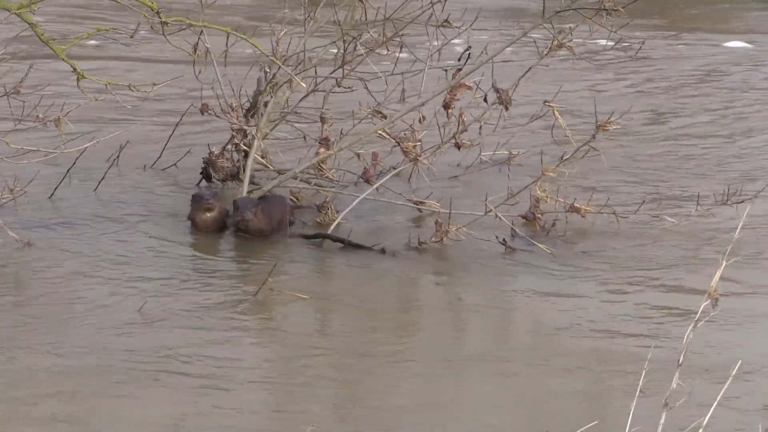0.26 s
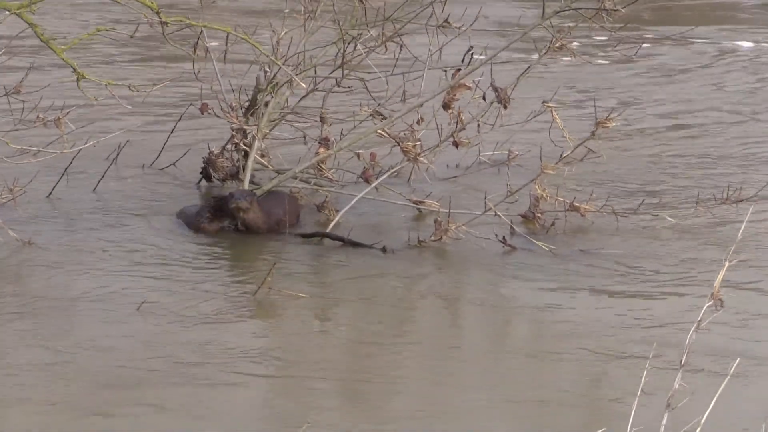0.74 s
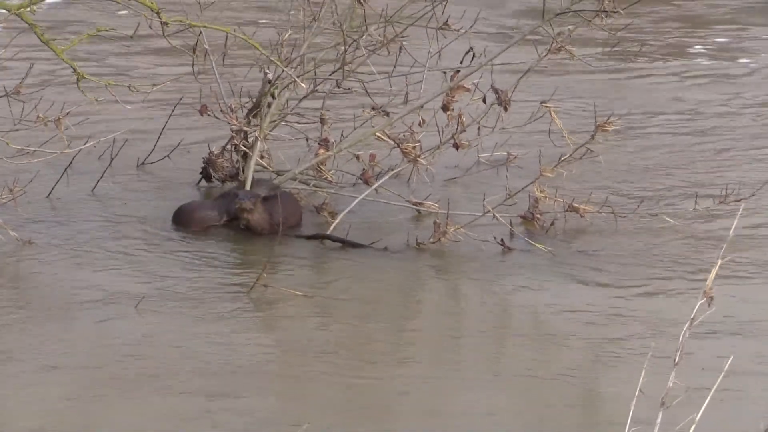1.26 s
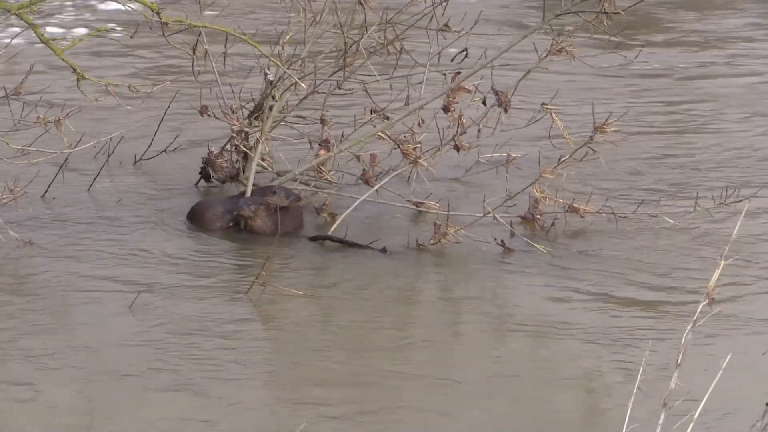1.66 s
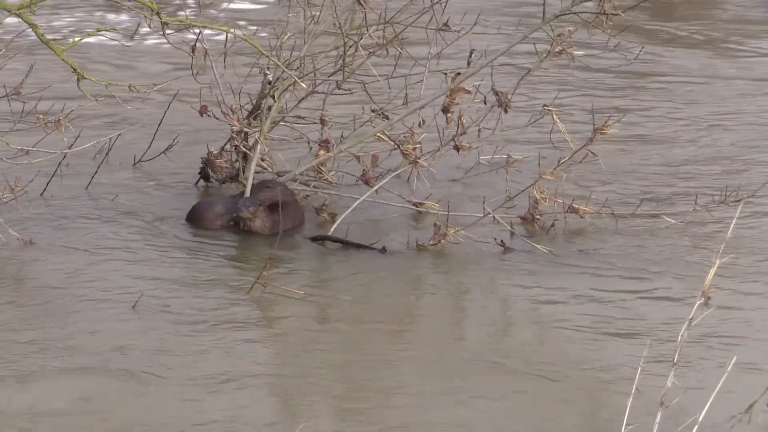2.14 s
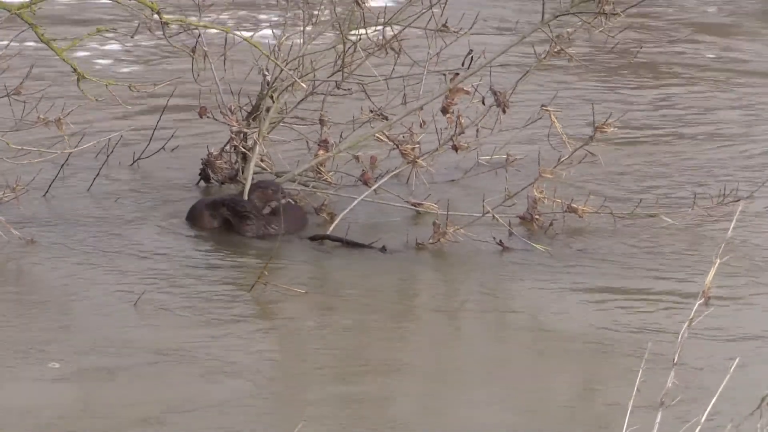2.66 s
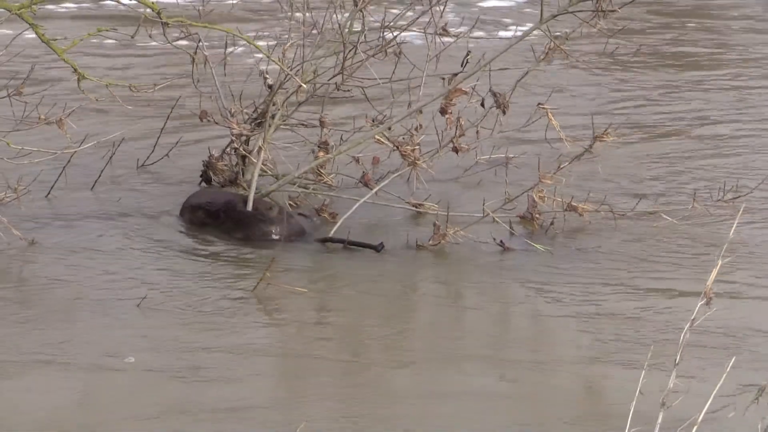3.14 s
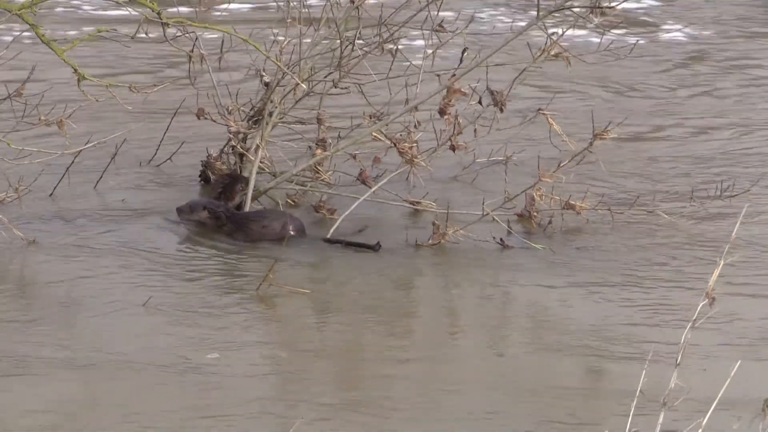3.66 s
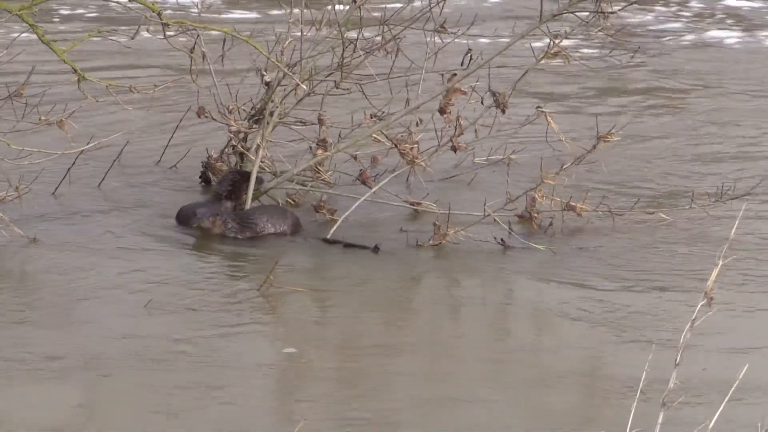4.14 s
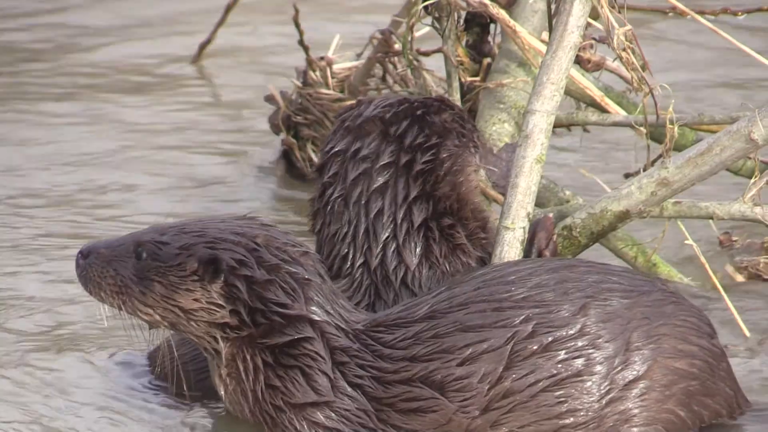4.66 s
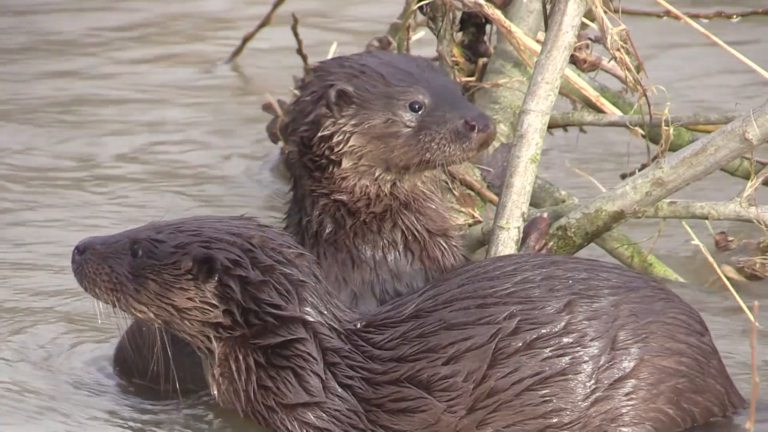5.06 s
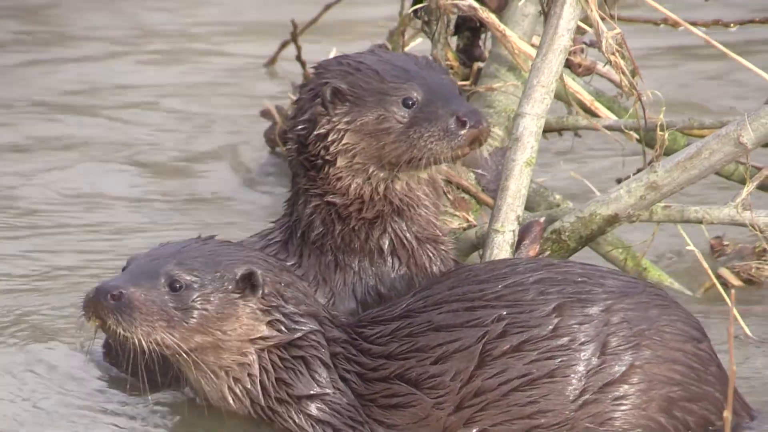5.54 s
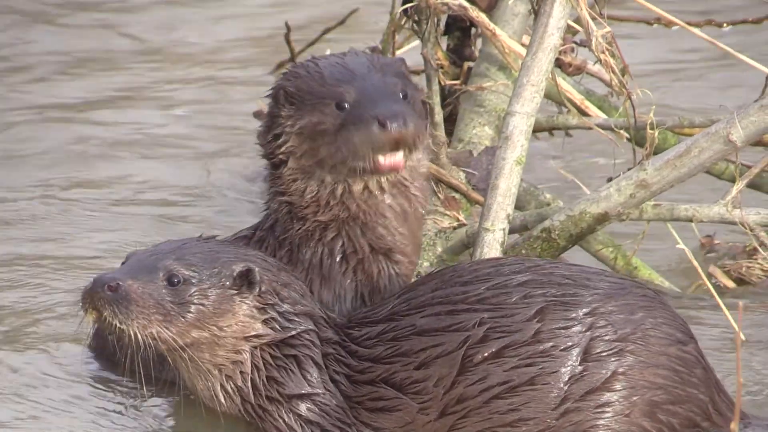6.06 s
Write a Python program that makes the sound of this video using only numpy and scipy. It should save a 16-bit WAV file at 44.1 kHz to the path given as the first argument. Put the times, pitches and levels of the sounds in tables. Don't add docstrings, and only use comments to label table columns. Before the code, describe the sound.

Two young otters give short, piercing, high whistle-squeaks about twice a second over the steady low rush of a flooded river.

```python
import sys
import numpy as np
from scipy import signal
from scipy.io import wavfile
from scipy.ndimage import uniform_filter1d, minimum_filter1d

SR = 44100
rng = np.random.default_rng(int(sys.argv[2]) if len(sys.argv) > 2 else 0)


def elevation(decibels):
    levels = np.asarray(decibels, float)
    return 10 ** (levels / 20)


def generate_wav(signal):
    frames = np.transpose(np.atleast_2d(signal))
    scaled = np.clip(frames, -1, 1) * 32767
    pcm = np.round(scaled).astype(np.int16)
    wavfile.write(sys.argv[1], SR, pcm)


N = 278271

# frequency in Hz, level in dB per Hz.
RIVER_SPECTRUM = [(71, -18), (120, -11), (220, -8), (264, -14), (357, -9.5), (455, -14), (770, -12),
                  (1760, -20), (5350, -40), (13600, -51), (15000, -70)]
# frequency in Hz, left-right correlation 0-1.
RIVER_LIKENESS = [(100, 1), (250, 0.83), (400, 0.89), (600, 0.91), (1200, 0.86), (2500, 0.64), (6000, 0.53),
                  (12000, 0.056)]
# time in s, level in dB.
RIVER_FLOW = [(0, -34), (.3, -31.5), (.7, -32.5), (1.2, -33), (1.7, -32), (2.1, -34), (2.5, -34),
              (3.2, -33), (4.1, -34), (5.0, -33.5), (5.95, -33.5), (6.31, -33)]
# time in s, level in dB.
WIND_GUSTS = [(0.0, -24), (0.1, -12.5), (0.24, -19.5), (1.28, -29), (1.44, -23), (1.54, -25.5),
              (1.67, -20.5), (2.09, -24.5), (2.3, -17), (2.44, -31), (2.49, -19), (2.79, -27.5),
              (2.9, -14.5), (2.99, -23), (3.85, -21.5), (3.99, -31.5), (6.27, -40), (6.31, -36)]
# time in s, change in dB, half width in s.
WIND_BUFFETS = [(.05, -4.5, 0.039), (.25, 2, 0.035), (.6, -3.5, 0.072), (.97, 2, 0.046), (1.15, 2.5, 0.033),
                (1.38, 3, 0.078), (1.65, 0, .04), (1.82, 3, 0.056), (1.95, 0, .04), (2.06, 2.5, .04),
                (2.2, 4, .04), (2.45, 2.5, 0.052), (2.92, -3.5, .03), (3.15, 3, 0.055), (3.53, 6, 0.06),
                (3.93, 0.5, .04), (4.2, -1.5, 0.076), (6.1, 3.5, .15)]
# frequency in Hz, width in Hz, level in dB, start in s, end in s.
MACHINE_HUMS = [
    (44, 6, -35, 4.75, 7.6),
    (63.1, 5.3, -37, 5.2, 7.1),
    (105.8, 9.7, -33, 0.2, 3.9),
    (106, 13, -35, 3.9, 6.4),
    (132.4, 4.5, -37.5, 3.2, 4.7),
    (215.3, 11.4, -49, 2.4, 5.83),
    (240, 2.9, -46, 0.1, 7.5),
]
# time in s, peak in dB, above 10 kHz relative in dB, left minus right in dB.
TWIG_TICKS = [(0.169, -54, -12, -12), (0.188, -54, -18, -12), (0.31, -55, -15, -10), (2.461, -59, -20, 5),
              (2.616, -54, -22, -8), (2.68, -57, 0, -10), (2.78, -56, -8, 5), (5.58, -59, -12, -8),
              (0.7427, -53, -18, 1), (1.2057, -56, -20.5, 15), (1.299, -53, -8.5, 12), (1.44, -43, -15, 4),
              (1.5616, -49, -10, -15), (1.6992, -53, -6, 13), (2.105, -53, -15, 2), (2.4892, -55, -3, 9),
              (2.6594, -50, -8, -15), (2.6933, -51, -28, 7), (2.7586, -52, -3, 5), (2.812, -47, -16, 4),
              (2.91, -45, -22, 2), (3.0051, -52, -9, 18), (3.0494, -56, -1, 12), (3.4745, -54, -26, 8),
              (3.5418, -55, -22, 10), (3.6421, -50, -12, 6), (3.815, -52, -28, 12), (4.0467, -50, -23, 16),
              (4.5121, -41, -43, -1), (4.8005, -44, -22, 5), (5.6077, -52, -12.5, 2),
              (5.9653, -57, -18, 5.5), (6.2164, -33.5, -22, -1)]
TWIG_KNOCKS = [
    (0.2764, -51, -13, -17),
    (0.6818, -49, -19.5, -13),
    (0.7891, -48.5, -11, -14),
    (1.4744, -53, -19, 0),
    (1.934, -50, -22, -11),
    (2.0403, -48.5, -9, -15),
    (2.552, -51, -12, -14),
    (5.5318, -46, -30, -12),
    (5.638, -48.5, -11, -14),
    (6.2507, -48, -19, -9),
]
# time in s, level in dB, pitch in Hz, T60 in s.
WATER_GLUGS = [
    (.32, -26, 1360, 0.1),
    (2.32, -23, 930, 0.15),
    (2.325, -23, 810, 0.082),
    (2.41, -22, 448, 0.055),
    (3.055, -21, 720, 0.083),
    (3.17, -21.5, 678, 0.21),
    (6.11, -18, 700, 0.05),
    (5.94, -14, 475, 0.016),
]
# time in s, peak in dB, centre in Hz,
# width in Hz.
DROP_PLOPS = [
    (0.329, -25.5, 2400, 1900),
    (0.328, -23, 1600, 900),
    (1.4732, -24, 1700, 2200),
    (1.455, -33, 1600, 2000),
    (1.953, -40, 3600, 1500),
    (3.256, -37, 5280, 2490),
    (4.181, -40, 5100, 1400),
    (4.523, -27, 5000, 4500),
]
# start in s, end in s.
CALL_SPANS = [(.423, .553), (.566, .668), (1.357, 1.465), (1.814, 1.93), (2.237, 2.338), (2.809, 2.919),
              (3.343, 3.432), (3.921, 4.04), (4.442, 4.545), (4.738, 4.864), (5.25, 5.363), (6.126, 6.246),
              (6.19, 6.307), (4.47, 4.538)]
# top pitch in Hz, pitch rise time in s, share by which the pitch starts low,
# level in dB once the throat is open, how far the octave follows the level 0-1.
CALL_VOICES = [(6120, 0.016, .14, -38.5, .7), (5600, 0.031, 0.12, -18, 0.9), (5604, 0.02, 0.16, -9, 0.7),
               (6120, 0.019, 0.12, -15, 0.06), (5470, .02, 0.13, -14, 1), (5985, 0.03, 0.11, -6, 0.74),
               (5440, 0.038, 0.069, -36.5, 0.9), (6066, 0.022, 0.17, -16.5, 0.76),
               (5402, .018, 0.081, -22, 0.6), (6070, 0.0184, 0.12, -24.5, 1),
               (5565, 0.0209, 0.063, -13.5, 0.7), (6014, 0.018, 0.099, -5.5, 1),
               (5820, 0.034, .13, -33.5, .7), (5554, 0.0069, 0.025, -10, 0.65)]
# soft lead-in in s, attack in s, hold in s, swell over the hold in dB,
# lead-in relative level in dB.
CALL_EFFORTS = [(.012, 0.029, 0.1, 7.5, 6), (0.017, 0.021, 0.029, 8.5, -22), (0.012, 0.034, 0.028, -2, -25),
                (0.05, 0.02, .025, -1.5, -17), (0.016, 0.016, 0.034, 2.5, -27.5),
                (0.016, 0.016, 0.055, -4.5, -22.5), (0.022, 0.0066, 0.051, 0, -11.5),
                (0.0065, 0.044, 0.039, -7, -27), (0.029, 0.0031, 0.038, 10, -27),
                (0.016, 0.012, 0.077, 9, -12.5), (0.006, 0.046, 0.043, -5.5, -24),
                (0.0047, 0.012, 0.07, 7.5, -22), (0.0066, .027, 0.12, 8, 1),
                (0.0019, 0.0067, 0.0072, -1, -30)]
# release in dB per s, share the pitch sags before the end, sag time in s,
# share it falls as the throat shuts, octave swell over the call in dB.
CALL_ENDINGS = [(300, .03, 0.016, .22, -2), (796, 0.053, 0.0106, 0.14, -14.5),
                (840, 0.108, 0.0098, 0.24, -5), (1300, 0.032, 0.011, 0.24, -12),
                (600, 0.016, 0.0035, 0.098, 3), (1500, 0.012, 0.0021, 0.19, 18),
                (500, 0.025, 0.0048, 0.09, -13), (600, 0.022, 0.0085, 0.3, -15),
                (700, .005, 0.0076, .11, -5), (1600, 0.041, 0.0147, 0.19, -9),
                (600, 0.031, 0.01, 0.198, -3), (753, 0.035, 0.012, 0.11, 7), (700, 0.049, 0.0097, .16, -2),
                (700, 0.017, 0.0054, .2, 4)]
# third harmonic relative in dB, rasp of air relative to the octave in dB.
CALL_EDGES = [(-2, -22), (18.5, -17.5), (3, -17), (-2, -22), (-3.5, -23), (-2, -26.5), (-4, -22), (-2, -24),
              (7.5, -23), (-2, -26), (-6, -24), (-2, -20), (-2, -22.5), (-2, -22)]
# octave relative in dB, left minus right in dB, near scatter in dB,
# bank echo in dB, far trees in dB.
CALL_HEADINGS = [(-21, 1.5, -18, -34, -34), (-19, 2, -12.5, -49, -38), (-24.5, 2.5, -14.5, -56, -40),
                 (-46, 2, -10, -34, -30), (-11.5, 2.5, -13.5, -65, -29.5), (-23, 0.5, -10.5, -62, -35),
                 (-8.5, 4.5, -8, -23.5, -18), (-24.5, 1.5, -10.5, -40, -21.5), (-7.5, 4, -26, -57, -62),
                 (-22, 1.5, -17, -27, -20), (-15.5, 4, -7.5, -30, -23), (-27.5, 1, -14.5, -40, -53.5),
                 (-31, 1, -33, -39, -42.5), (-22, 5.5, -2.5, -24, -23.5)]
# time in s, change in dB, half width in s.
VOICE_CATCHES = [(.449, -7, 0.0055), (0.522, -16, 0.013), (1.363, -10, .003), (1.392, -5, .004),
                 (1.837, -4, .006), (1.867, -12, 0.0013), (1.915, -21, 0.0033), (2.819, -18, 0.0053),
                 (2.833, -7, .003), (4.458, -8, .003), (4.493, -15.5, 0.0083), (4.751, -14, 0.0027),
                 (4.792, -8, 0.0059), (4.815, -8, 0.0025), (5.333, -4, 0.0023), (5.343, -16, 0.0032),
                 (3.365, -3, 0.0036), (3.389, -8, 0.0034), (3.423, 2, 0.0027), (3.94, -7, .006),
                 (4.004, -4, 0.0035), (5.311, -3, 0.0027), (2.905, -16, 0.0017), (.582, 8, .005),
                 (.638, -0.5, 0.0063), (0.649, 8.5, .004), (1.439, -5, 0.0017), (1.458, -5, 0.0062),
                 (1.928, -9, .005), (2.247, 3, .006), (2.29, 1.5, 0.004), (2.312, -1.5, .008),
                 (2.336, -9, .005), (2.916, -3, .005), (.665, -1, .005), (2.845, -1, .008),
                 (3.415, 2, .006), (3.965, -3, .008), (3.972, -2, .006), (3.985, 2, .006),
                 (3.997, -1, .005), (3.93, 3, .006), (4.034, -4, .005), (4.472, 6, .002),
                 (4.501, 6, 0.0035), (4.517, -7, 0.0066), (4.79, 6, .006), (4.859, -8, .007),
                 (5.322, -2.5, .007), (5.358, -7, 0.0098), (6.229, -6, .005), (6.244, -5, 0.0065),
                 (6.303, -4, 0.0046)]
# time in s, change in dB, half width in s.
OCTAVE_BREAKS = [(.578, -12, .003), (.63, -3, .01), (.65, 8, 0.0086), (1.41, 1, .008), (1.435, -4, .003),
                 (1.842, -10, .003), (1.852, 6, .006), (1.864, -8, .003), (2.245, -3, .006),
                 (2.31, 5, .008), (2.838, -10, .003), (3.36, -9, 0.0037), (3.385, 6, .01),
                 (3.929, -11, .01), (3.99, -10, .003), (4.455, 1, .008), (4.742, -10, .005),
                 (4.79, -12, .004), (4.815, 4, .008), (4.857, -10, .006), (5.258, -16, .004),
                 (5.305, 6.5, 0.011), (5.355, -18, 0.013), (6.162, -13, .003), (6.213, -2, .003)]
# time in s, shift in Hz, half width in s.
PITCH_BENDS = [(.47, -43, 0.0088), (.575, 41, 0.011), (1.365, 64, 0.01), (1.442, -130, 0.0055),
               (1.838, 50, 0.0065), (1.856, 86, 0.011), (1.89, -26, 0.013), (1.925, -100, .005),
               (2.244, 69, 0.018), (2.291, 54, 0.0048), (2.3, -18, 0.0034), (2.312, 61, 0.0036),
               (2.83, 65, 0.0051), (2.842, 39, .004), (3.36, -46, 0.0066), (3.415, 30, 0.01),
               (3.922, 170, 0.0074), (3.95, 50, .004), (4.02, -30, .008), (4.455, 59, 0.011),
               (4.74, 200, 0.007), (4.812, 61, 0.0053), (4.828, 29, 0.012), (5.258, 60, 0.004),
               (5.29, -20, 0.011), (5.335, 47, 0.0055), (6.135, -50, 0.0063), (6.215, -33, 0.011)]
# time in s, level under the tone in dB, half width in s.
FOLD_RATTLES = [(.605, -34, .01), (.65, -28, .008), (1.40, -32, .01), (1.443, -16, 0.0054),
                (1.876, -20, .006), (2.275, -37, 0.01), (2.30, -27, .012), (2.838, -38, .006),
                (2.885, -29, 0.021), (3.36, -14, .012), (3.40, -18, .015), (3.95, -11, .004),
                (4.0, -17, .005), (4.512, -26, 0.007), (4.802, -20, 0.011), (5.28, -27, .008),
                (5.315, -25, 0.0099), (5.34, -18, 0.009), (6.15, -30.5, 0.014), (6.218, -24.5, 0.0046)]
PORT_LEAD_RAD = [0.39, -0.66]
# time in s, change in dB, half width in s.
TAIL_PATCHES = [(.7, 2, .015), (.76, 1, .04), (.88, -3, .02), (1.0, -2, .03), (1.52, -12, 0.032),
                (1.585, 6, .015), (1.65, 7, .015), (1.7, -6, .03), (1.98, 3, .03), (2.03, -9, .015),
                (2.11, -3, .03), (2.38, -12, 0.021), (2.48, 3.5, 0.037), (2.571, 5, .02), (2.63, -4, .02),
                (2.7, -8, .02), (.83, 4, .02), (2.96, 5, .01), (3.03, -5, .02), (3.1, -1, .015),
                (3.22, 10, .03), (4.11, -1, .03), (4.18, 1, .02), (4.24, 2, .02), (4.33, -1, .025),
                (4.41, -3, .03), (4.565, -5, 0.014), (4.6, 3, .01), (4.68, 4, 0.027), (4.95, -10, 0.01),
                (5.12, 0, 0.026), (5.19, -1, .02), (5.4, -6, .022), (5.44, 3, 0.0086), (5.49, 4, 0.022),
                (5.555, 2, .035), (5.63, 5, 0.022), (5.69, 5, 0.022), (4.79, 11.5, .05)]
# time in s, pitch in Hz, level in dB.
BIRD_WHISTLE = [
    (3.99, 8420, -76),
    (4.02, 8300, -64),
    (4.05, 8230, -64),
    (4.075, 8330, -64),
    (4.092, 8060, -63),
    (4.125, 7990, -63),
    (4.165, 7920, -59),
    (4.18, 7780, -72),
]
# frequency of the tone in Hz, level below it that is hidden in dB.
HIDING_REACH = [(5000, -43), (7000, -43), (10000, -27), (13000, -27)]

REBOUND_S, REBOUND_DB, REBOUND_DULL_DB = .02, -5, -4
ONSET_S, ONSET_DB = 0.0028, -8.5
RISE_CURVE = 0.896
SHUT_S, SHUT_DB, OCTAVE_SHUT_DB = 0.013, -14, -30
OCTAVE_LEAD_S, OCTAVE_PAN_DB, OCTAVE_WAVER_DB = 0.0057, 2, 2
NEAR_T60_S, BANK_S, FAR_T60_S, FAR_END_S = 0.11, 0.134, 1.27, .43
CHANGE_S, CHANGE_FADE_S = 4.521, .0008
QUIET_TOP_HZ = 14300


def unit(x):
    return x / np.sqrt(np.mean(x ** 2))


def curve(table):
    s, *columns = np.transpose(table)
    return [np.interp(np.arange(N) / SR, s, c) for c in columns]


def on_log(table, hz):
    table_hz, values = np.transpose(table)
    return np.interp(np.log(hz), np.log(table_hz), values)


def bumps(t, table):
    return sum(size * np.exp(-((t - s) / half) ** 2) for s, size, half in table)


def between(start, end, fade):
    t = np.arange(N) / SR
    return np.clip(np.minimum(t - start, end - t) / fade, 0, 1)


def band(x, hz, width_hz):
    edges = np.clip([hz - width_hz / 2, hz + width_hz / 2], 5, .49 * SR)
    return signal.sosfilt(signal.butter(2, edges, "band", fs=SR, output="sos"), x)


def steep_band(x, hz, width_hz):
    return band(band(x, hz, width_hz), hz, width_hz)


def walk(rate):
    k = int(SR / rate)
    held = np.repeat(rng.standard_normal(N // k + 1), k)
    return 1.3 * uniform_filter1d(uniform_filter1d(held, k), k)[:N]


def pan(x, db):
    return x * elevation(np.array([db, -db]) / 2).reshape(2, -1)


def pair(likeness):
    mid, side = rng.standard_normal((2, N))
    c = np.clip(likeness, 0, 1)
    return np.sqrt((1 + c) / 2) * mid + np.sqrt((1 - c) / 2) * side * np.array([[1], [-1]])


def river():
    out, low_swell, high_swell = 0, walk(2.94), walk(4.3)
    for hz in 100 * 2 ** np.arange(0, 7.3, 1 / 3):
        share = np.log2(hz / 100) / 7.3
        swell = (1 - share) * low_swell + share * high_swell
        db = on_log(RIVER_SPECTRUM, hz) + .35 * swell + 1.2 * walk(14)
        out = out + elevation(db) * band(pair(on_log(RIVER_LIKENESS, hz)), hz, 0.24 * hz)
    return pan(unit(out) * elevation(curve(RIVER_FLOW)[0] + 2.0), 1.0)


def wind():
    buffet_db = bumps(np.arange(N) / SR, WIND_BUFFETS)
    lumps = elevation(curve(WIND_GUSTS)[0] + buffet_db + 1.8 * walk(9) - .3)
    thump = unit(band(pair(.62), 40.4, 43.4))
    flutter = unit(band(pair(.3), 57.0, 80))
    return lumps * (thump + elevation(-6) * flutter)


def hum():
    out = 0
    for hz, width, db, start, end in MACHINE_HUMS:
        out = out + elevation(db) * between(start, end, 0.031) * unit(band(pair(1.0), hz, width))
    return out


def twigs():
    out, t = np.zeros((2, N + SR)), np.arange(700) / SR
    shape = np.exp(-t / 0.0024) + .35 * np.exp(-t / .006)
    rebounds = [(s + REBOUND_S, db + REBOUND_DB, top_db + REBOUND_DULL_DB, pan_db)
                for s, db, top_db, pan_db in TWIG_KNOCKS]
    for s, db, top_db, pan_db in [*TWIG_TICKS, *TWIG_KNOCKS, *rebounds]:
        burst = shape * rng.standard_normal(len(t))
        tick = band(burst, 6000, 4800) + elevation(top_db + 1.0) * steep_band(burst, 12900, 4800)
        tick = steep_band(tick, 9300, 13400)
        i = int(s * SR)
        out[:, i:i + len(t)] += pan(tick * elevation(db + 12.5) / np.abs(tick).max(), pan_db)
    return out[:, :N]


def glugs():
    out, t = np.zeros(N + SR), np.arange(9000) / SR
    for s, db, hz, t60 in WATER_GLUGS:
        i = int(s * SR)
        ring = elevation(db - 60 * t / t60) * (1 - np.exp(-t / (0.075 * t60)))
        out[i:i + len(t)] += ring * np.sin(2 * np.pi * hz * t * (1 + 0.39 * t))
    return out[:N]


def plops():
    out, t = np.zeros(N + SR), np.arange(500) / SR
    for s, db, hz, width in DROP_PLOPS:
        burst = steep_band(np.exp(-t / .003) * rng.standard_normal(len(t)), hz, width)
        i = int(s * SR)
        out[i:i + len(t)] += elevation(db) * burst / np.abs(burst).max()
    return out[:N]


def contour(start, end, top_hz, rise_s, rise, lead_s, attack_s, hold_s, swell_db, lead_db,
            release_db_per_s, sag, sag_s, fall):
    t = np.arange(0, end - start, 1 / SR)
    knee = end - start - SHUT_S
    held = min(lead_s + attack_s + hold_s, knee - 1 / SR)
    shutting = np.clip((t - knee) / SHUT_S, 0, 1)
    below = rise * np.exp(-(t / rise_s) ** RISE_CURVE)
    below += sag * np.exp(np.minimum(t - knee, 0) / sag_s)
    below += fall * shutting ** 1.6
    times = [0, min(ONSET_S, lead_s), lead_s, lead_s + attack_s, held, knee]
    released_db = swell_db - release_db_per_s * (knee - held)
    steps = [lead_db + ONSET_DB, lead_db, lead_db, 0, swell_db, released_db]
    return t, top_hz * (1 - below), lambda early: np.interp(t + early, times, steps), shutting


def whistle(span, voice, effort, ending, octave_db, pan_db, third_db, rasp_db):
    *tune, level_db, follow = voice
    *release, octave_swell_db = ending
    t, pitch, push, shutting = contour(*span, *tune, *effort, *release)
    clock = span[0] + t
    pitch = pitch + bumps(clock, PITCH_BENDS)
    phase = 2 * np.pi * np.cumsum(uniform_filter1d(pitch, size=220)) / SR

    base_db = level_db + push(0) + bumps(clock, VOICE_CATCHES) + SHUT_DB * shutting
    high_db = level_db + octave_db + follow * push(OCTAVE_LEAD_S) + octave_swell_db * (t / t[-1] - .5)
    high_db = high_db + OCTAVE_SHUT_DB * shutting + bumps(clock, OCTAVE_BREAKS)
    edge = np.clip(np.minimum(t - t[0], t[-1] - t) / .002, 0, 1)
    base, octave = [np.sqrt(2) * edge * elevation(uniform_filter1d(db, size=90)) for db in (base_db, high_db)]
    flutter, waver, rough, grit = rng.standard_normal((4, len(t)))
    octave = octave * elevation(OCTAVE_WAVER_DB * unit(band(waver, 70, 100)))

    ports = np.array([[.5], [-.5]])
    tone = pan(base * np.sin(phase + ports * PORT_LEAD_RAD[0]), pan_db)
    tone += pan(octave * np.sin(2 * phase + ports * PORT_LEAD_RAD[1]), pan_db + OCTAVE_PAN_DB)
    rattle = bumps(clock, [(s, elevation(db), half) for s, db, half in FOLD_RATTLES])
    shimmer = 1 + elevation(-38) * unit(band(flutter, 250, 350)) + rattle * unit(steep_band(rough, 520, 760))

    air = rng.standard_normal((2, len(t)))
    rasp = elevation(rasp_db) * octave * unit(steep_band(air, 10100, 4400))
    halo = elevation(-23) * octave * unit(steep_band(grit, pitch.max() + 450, 1500))
    third = elevation(third_db) * steep_band(octave ** 2 * np.sin(3 * phase), 15580, 520)
    return shimmer * tone + rasp + halo + third


def scatter(near_db, bank_db, far_db):
    t = np.arange(int(.6 * SR)) / SR
    near = elevation(-60 * t / NEAR_T60_S) * np.clip(t / 0.0041, 0, 1)
    bank = np.exp(-((t - BANK_S) / .014) ** 2)
    far = elevation(-60 * t / FAR_T60_S) * np.clip(t / 0.064, 0, 1) / (1 + np.exp((t - FAR_END_S) / .03))
    far = far * elevation(5 * unit(uniform_filter1d(rng.standard_normal(len(t)), size=350)))
    near, bank, far = [x / np.linalg.norm(x) for x in (near, bank, far)]
    own, common = rng.standard_normal((2, len(t))), rng.standard_normal(len(t))
    leaves = 1.2 * own + 0.37 * common
    close = elevation(near_db) * signal.lfilter([1, -.7], [1], near * leaves)
    return close + band((elevation(bank_db) * bank + elevation(far_db) * far) * leaves, 5700, 5800)


def otters():
    out = np.zeros((2, N + SR))
    calls = zip(CALL_SPANS, CALL_VOICES, CALL_EFFORTS, CALL_ENDINGS, CALL_EDGES, CALL_HEADINGS)
    for k, (span, voice, effort, ending, edges, heading) in enumerate(calls):
        octave_db, pan_db, *room_db = heading
        call = whistle(span, voice, effort, ending, octave_db, pan_db, *edges)
        heard = signal.fftconvolve(call, scatter(*room_db), axes=1)
        i = int(span[0] * SR)
        clock = (np.arange(heard.shape[1]) + i) / SR
        heard *= elevation(bumps(clock, TAIL_PATCHES))
        heard[:, :call.shape[1]] += call
        if span[0] < CHANGE_S < span[1]:
            after = np.clip((clock - CHANGE_S) / CHANGE_FADE_S, 0, 1)
            heard *= after if k == len(CALL_SPANS) - 1 else 1 - after
        out[:, i:i + heard.shape[1]] += heard
    return out[:, :N]


def bird():
    hz, db = curve(BIRD_WHISTLE)
    level = elevation(db + 3 + 2.5 * walk(46)) * between(BIRD_WHISTLE[0][0], BIRD_WHISTLE[-1][0], .01)
    return level * np.sin(2 * np.pi * np.cumsum(hz + 60 * walk(150)) / SR)


def scene():
    return river() + wind() + hum() + twigs() + glugs() + plops() + otters() + bird()


def masking(x):
    hz, _, z = signal.stft(x, SR, "blackmanharris", nperseg=1024, noverlap=704)
    width = 8
    bands = np.abs(z[:, :-1].reshape(len(x), -1, width, z.shape[2]))
    level = 10 * np.log10(np.mean(bands ** 2, axis=2) + 1e-18)
    edge = hz[:-1:width, None] + 1
    fall = -1.1 * np.arange(len(edge))[:, None]
    hidden = np.maximum.accumulate(level + on_log(HIDING_REACH, edge) - fall, axis=1) + fall
    hidden = -minimum_filter1d(-hidden, size=4, axis=2)
    audible = (level > hidden) & ((level > -86) | (edge < QUIET_TOP_HZ))
    keep = audible | (edge < 6000)
    z[:, :-1] *= np.repeat(keep, width, axis=1)
    return signal.istft(z, SR, "blackmanharris", nperseg=1024, noverlap=704)[1][:, :N]


def top_cut(x):
    return signal.sosfilt(signal.butter(12, 15880, fs=SR, output="sos"), x)


def record(dry):
    peak = -minimum_filter1d(-np.abs(dry).max(axis=0), size=900)
    gain = uniform_filter1d(np.minimum(1, .92 / peak), size=450)
    return top_cut(masking(dry * gain))


dry = scene()
out = record(dry)
generate_wav(out)
```